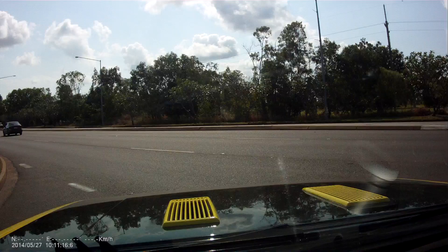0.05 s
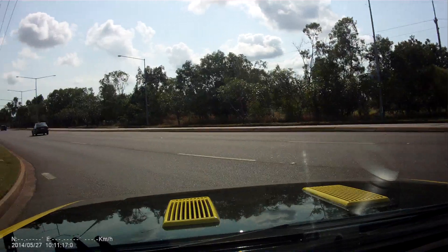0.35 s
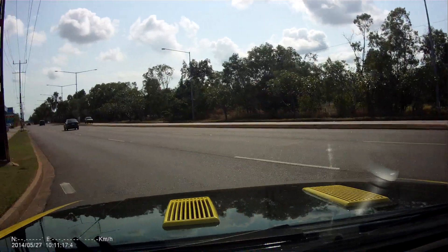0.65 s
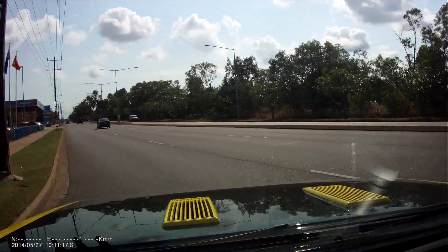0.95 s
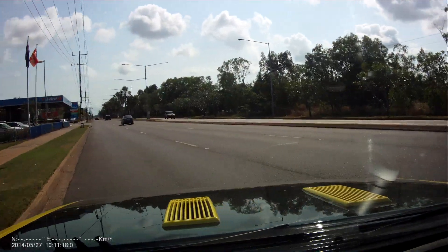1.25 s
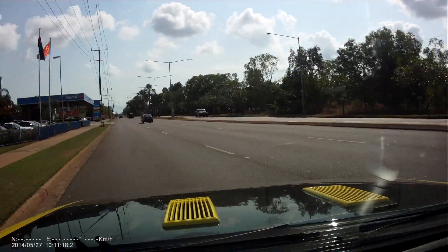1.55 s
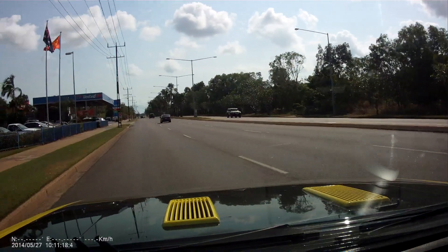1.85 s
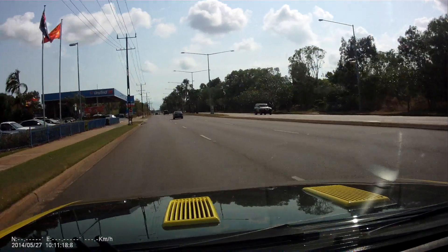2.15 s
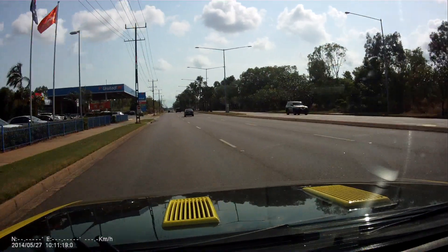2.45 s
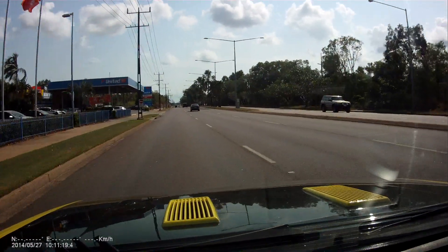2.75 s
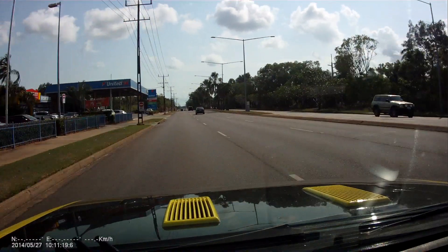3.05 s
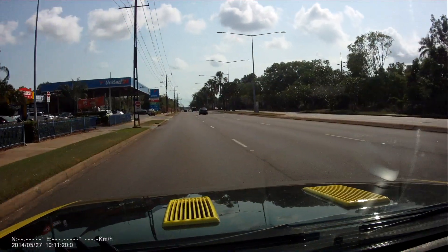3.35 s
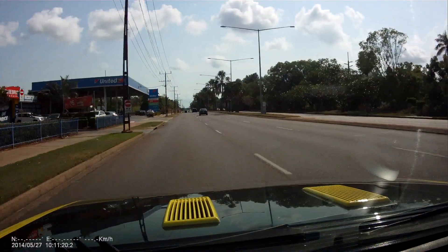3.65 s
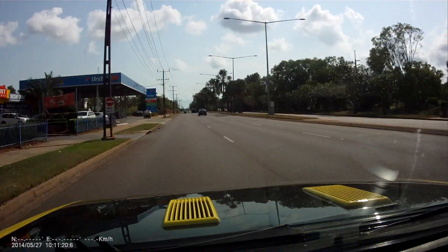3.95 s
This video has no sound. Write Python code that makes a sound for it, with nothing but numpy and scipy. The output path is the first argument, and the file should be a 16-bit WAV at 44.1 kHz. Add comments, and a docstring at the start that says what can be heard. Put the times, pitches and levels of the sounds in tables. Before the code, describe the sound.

A turbocharged car engine accelerates, heard inside the cabin over steady road rumble. Its drone rises for about 2.3 seconds, joined from 1.5 by a growing roar and thin climbing whistle. At 2.4 the gear changes: a deep boom slightly overloads the microphone, a valve hisses for half a second and the pitch falls. From 2.9 the engine climbs again with a faint whine. Plastic trim clicks near 0.4.

```python
"""An exhaust drone climbs over road rumble, inside a turbocharged six-cylinder car pulling hard.
The firings set the pitch, unequal cylinders add growl, and the turbo whistles up over roar and intake rush.
At the one gear change the blow-off valve dumps its boost with a hiss and the body shudders; then the engine
pulls again with a gear whine. Loose trim clicks, and the loudest booms overload the dashboard microphone.
"""
import sys
import numpy as np
from scipy import signal
from scipy.fft import rfft, irfft
from scipy.io import wavfile
from scipy.ndimage import uniform_filter1d

SR = 44100
rng = np.random.default_rng(int(sys.argv[2]) if len(sys.argv) > 2 else 0)


def materialize(psi):
    """Save the field psi as 16-bit PCM at rate SR to the path in sys.argv[1].

    A 1-D psi becomes a single channel; in a 2-D psi each row is a channel.
    """
    bounded = np.clip(np.atleast_2d(psi).T, -1, 1)
    quanta = np.round(bounded * 32767).astype(np.int16)
    wavfile.write(sys.argv[1], SR, quanta)


N = 176400
T = np.arange(N) / SR
FREQS = np.fft.rfftfreq(N, 1 / SR)
BAND_LIMIT_HZ = 15300

# tone colour of the cabin boom: f/Hz, level/dB
BOOM_SPECTRUM = [(10, -9), (29, 3), (42, -7.5), (58, -3.5), (73, -4.5), (95, -12.5), (150, -13),
                 (260, -17.5), (400, -63), (900, -61)]
# swell of the cabin boom: t/s, level/dB
BOOM_ENVELOPE = [(0, -29.5), (.15, -27), (.6, -28), (.78, -28), (.9, -20.5), (1.36, -26), (1.5, -16.5),
                 (1.7, -20.5), (1.9, -16), (2.28, -4.5), (2.38, -6), (2.6, -9), (2.75, -8), (2.9, -16.5),
                 (3.15, -21.5), (3.6, -17.5), (3.88, -16.5), (4, -13)]


def amp(db):
    """Decibels to gain."""
    return 10 ** (np.asarray(db) / 20)


def unit(x):
    """Scales to rms 1."""
    return x / np.sqrt(np.mean(x ** 2) + 1e-20)


def curve(table, column=1):
    """One column of a time table, at every sample."""
    table = np.array(table)
    return np.interp(T, table[:, 0], table[:, column])


def at_hz(table, hz):
    """Reads a spectrum on a log-frequency axis."""
    f, value = np.transpose(table)
    return np.interp(np.log(hz + 1), np.log(f), value)


def phase(hz):
    """Running angle of a steady or gliding pitch."""
    return 2 * np.pi * np.cumsum(hz * np.ones(N)) / SR


def swell(start, length):
    """A half-sine fade in and out."""
    return np.sin(np.pi * np.clip((T - start) / length, 0, 1))


def drift(rate_hz, bins=8000):
    """Slow random wander of rms 1."""
    real, imag = rng.standard_normal((2, bins))
    return unit(irfft((real + 1j * imag) / (1 + (FREQS[:bins] / rate_hz) ** 4), N))


def noise(spectrum):
    """Coloured noise of rms 1, partly alike in both channels."""
    # likeness of left and right: f/Hz, correlation
    likeness = [(120, 1), (220, .8), (500, .86), (4000, .8), (12000, .84)]
    left, other = rfft(rng.standard_normal((2, N)))
    same = at_hz(likeness, FREQS)
    right = same * left + np.sqrt(1 - same ** 2) * other
    return unit(irfft(np.array([left, right]) * amp(at_hz(spectrum, FREQS)), N))


def fuzzy_tone(hz, width_hz):
    """A band of noise that follows a pitch."""
    angle = phase(hz)
    return drift(width_hz / 2) * np.cos(angle) + drift(width_hz / 2) * np.sin(angle)


def exhaust_drone(firing_angle):
    """The exhaust pulses hum at the firing rate and its octave."""
    # drone: t/s, firing tone level/dB, octave level/dB
    levels = [(0, -18, -62), (.07, -19, -47), (.16, -28.5, -42), (.34, -28.5, -29), (.45, -21.5, -25.5),
              (.62, -18, -26.5), (.82, -9.5, -28), (1.2, -10.5, -26), (1.4, -7, -20.5), (1.53, -9.5, -12),
              (1.63, -12, -16.5), (1.75, -20.5, -27.5), (1.86, -11.5, -22), (2.1, -9, -23.5),
              (2.31, -12, -40), (2.39, -33, -30), (2.6, -35, -62), (2.75, -16, -65), (2.84, -14, -30.5),
              (2.92, -7.5, -15.5), (3.06, -10, -23), (3.5, -6.5, -19.5), (3.62, -9, -16),
              (3.78, -10.5, -15), (4, -20.5, -26.5)]
    partials = (amp(curve(levels, k) + .5 * drift(rate_hz=22)) * np.cos(k * firing_angle) for k in (1, 2))
    return np.sqrt(2) * sum(partials)


def exhaust_lines(firing_hz, firing_angle, cylinders=6, uneven_db=-50.5, waver_db=3):
    """Unequal cylinders add lines at sixths of the firing rate; the lowest four shake the cabin."""
    # engine load: t/s, level/dB
    load_envelope = [(0, -1), (1.5, 3), (1.95, 3.5), (2.37, -1.5), (2.41, -7), (2.82, -11.5), (2.91, 2.5),
                     (4, 0.5)]
    # prominent lines: multiple of the firing rate, level/dB
    orders = [(1.5, -35), (3, -34.5), (3.5, -47.5), (4, -40.5), (4.33, -41), (5, -43.5), (5.33, -44),
              (6.33, -43.5)]
    # standing waves of the cabin: f/Hz, level/dB
    standing_waves = [(200, -3.5), (305, 4), (345, -8.5), (400, 1.5), (520, -5), (580, 1), (700, -5.5),
                      (1300, -17)]
    # lowest four lines against the boom: level/dB
    shake_db = [-5.5, -1.5, -3, -3.5]
    load = amp(curve(load_envelope))
    prominent = {round(order * cylinders): db for order, db in orders}
    clean_hz, rough_hz = 151, 360
    rough = np.clip((firing_hz - clean_hz) / (rough_hz - clean_hz), 0, 1)
    out = np.zeros(N)
    for k in range(1, 40):
        order = k / cylinders
        if order in (1, 2):  # the drone plays these
            continue
        hz = firing_hz * order
        if k <= len(shake_db):
            db = shake_db[k - 1] + curve(BOOM_ENVELOPE) + at_hz(BOOM_SPECTRUM, hz)
        else:
            db = prominent.get(k, uneven_db - 9 * np.log2(order / 3)) + at_hz(standing_waves, hz)
        line = np.cos(order * firing_angle + 2 * np.pi * rng.random())
        if 2 < order < 5:  # these turn rough as the engine speeds up
            line = np.sqrt(1 - rough) * line + np.sqrt(rough / 2) * fuzzy_tone(hz, width_hz=32)
        out += load * amp(db + waver_db * drift(rate_hz=5)) * line
    return np.sqrt(2) * out


def road_rumble(level_db=-24):
    """Tyres roll on the road with a steady rumble."""
    # tyre noise: f/Hz, level/dB
    spectrum = [(15, -7.5), (30, 11), (45, -5.5), (110, -4.5), (220, -16.5), (330, -22), (490, -40),
                (590, -19), (760, -27), (1200, -38), (1700, -41), (2250, -49.5), (3000, -42), (4300, -52),
                (5700, -43.5), (6800, -57.5), (13300, -55), (15000, -71)]
    return noise(spectrum) * amp(level_db)


def cabin_boom(offset_db=-5.5):
    """The cabin booms with deep noise, loudest around the gear change."""
    boom = noise(BOOM_SPECTRUM)
    power = uniform_filter1d(boom[0] ** 2, size=4000)
    steadied = unit(boom / np.sqrt(power + 1e-6))
    return steadied * amp(curve(BOOM_ENVELOPE) + offset_db)


def combustion_roar(firing_angle, throb_depth=.13):
    """Combustion noise throbs with the firings."""
    # colour of the roar: f/Hz, level/dB
    spectrum = [(100, -24), (200, 2.5), (350, 1.5), (480, 0.5), (720, -10.5), (1200, -14.5), (1650, -17),
                (2200, -24), (3200, -28), (5000, -34), (15000, -52)]
    # swell of the roar: t/s, level/dB
    envelope = [(0, -47.5), (.6, -38.5), (1.3, -31.5), (1.55, -25), (1.72, -28), (1.83, -25), (2.24, -18.5),
                (2.34, -13.5), (2.41, -24.5), (2.6, -28), (2.93, -30.5), (3.7, -24), (4, -22)]
    throb = 1 + throb_depth * np.cos(firing_angle)
    return noise(spectrum) * amp(curve(envelope) + .64 * drift(rate_hz=91)) * throb


def intake_rush():
    """Air streams into the intake with a bright, grainy rush."""
    # colour of the rush: f/Hz, level/dB
    spectrum = [(800, -27), (2500, -3), (4500, -0.5), (8000, 1.5), (10500, 3), (13000, -1.5), (15500, -9.5)]
    # swell of the rush: t/s, level/dB
    envelope = [(0, -62), (1.55, -49), (1.8, -42), (2.2, -39), (2.34, -32), (2.4, -36.5), (2.5, -54),
                (2.9, -54.5), (3.3, -47.5), (3.65, -43), (4, -40.5)]
    return noise(spectrum) * amp(curve(envelope) + .76 * drift(rate_hz=110))


def turbo(flicker_db=4):
    """The turbo spins a thin, trembling whistle, with rushing air just below and a fainter band above."""
    # whistle: t/s, f/Hz, level/dB
    spool = [(0, 2800, -78), (1, 4550, -74), (1.45, 5450, -62), (1.58, 5650, -59.5), (1.8, 7680, -50),
             (1.93, 8780, -46.5), (2.07, 9720, -52), (2.22, 10200, -52), (2.32, 10800, -45.5),
             (2.45, 11000, -72), (2.9, 4500, -72), (3.02, 4780, -61), (3.26, 5750, -61.5),
             (3.45, 6600, -57), (3.8, 8700, -49.5), (4, 9400, -46.5)]
    hz = curve(spool) * (1 + .003 * drift(rate_hz=120))
    whistle = np.sqrt(2) * np.cos(phase(hz)) * amp(.3 + flicker_db * drift(rate_hz=28))
    air_below = amp(.7) * fuzzy_tone(.94 * hz, width_hz=1400)
    air_above = amp(-2) * fuzzy_tone(1.43 * hz, width_hz=1100)
    return amp(curve(spool, column=2)) * (whistle + air_below + air_above)


def trim_clicks(attack_s=.0012, ring_db=-4.5):
    """Loose plastic rattles in short, scratchy clicks; those that ring lower are also duller."""
    # clicks: t/s, level/dB, 60 dB decay/s, ring f/Hz
    clicks = [(0.26, -28.5, 0.046, 10540), (.331, -44.5, 0.041, 6500), (0.353, -41.5, 0.035, 7240),
              (.367, -44, 0.038, 6460), (0.4, -15.5, 0.018, 10760), (.402, -24, 0.068, 7900),
              (0.405, -25, 0.065, 268), (.425, -28, 0.024, 8600), (0.437, -38, 0.035, 1520),
              (2.648, -32, 0.079, 13700), (2.671, -33, .08, 13500), (2.803, -32.5, .06, 12700),
              (3.453, -27, 0.05, 11800)]
    # colour of the plastic: f/Hz, level/dB
    spectrum = [(1500, -7.5), (3000, -4.5), (5500, -2), (7800, 2), (9000, -2.5), (10200, 9), (12000, -15),
                (15500, 5.5)]
    plastic = noise(spectrum)
    out = np.zeros((2, N))
    for start, db, t60, hz in clicks:
        age = np.maximum(T - start, 0)
        envelope = np.minimum(age / attack_s, 1) * amp(db - 60 * np.minimum(age / t60, 2))
        lowpass = signal.butter(1, min(1.25 * hz, BAND_LIMIT_HZ), fs=SR)
        scratch = unit(signal.lfilter(*lowpass, plastic))
        out += envelope * (scratch + amp(ring_db) * fuzzy_tone(hz, width_hz=290))
    return out


def body_shudders(hz=29.3):
    """The car body shudders as the load changes."""
    # shudders: t/s, length/s, level/dB
    shudders = [(0.655, 0.22, -16), (1.421, .2, -13.5), (2.388, 0.25, -8.5)]
    out = np.zeros(N)
    for start, length, db in shudders:
        out += amp(db) * swell(start, length) * np.sin(2 * np.pi * hz * (T - start))
    return np.sqrt(2) * out


def growls(firing_hz, rasp_db=-8):
    """One uneven exhaust line at a time swells under boost or barks as the throttle shuts."""
    # growls: t/s, length/s, multiple of the firing rate, level/dB
    events = [(1.817, 0.36, 2.333, -25.5), (2.327, 0.037, 1.833, -18.5), (2.361, 0.046, 1.5, -12),
              (2.442, .08, 1.333, -22)]
    out = np.zeros((2, N))
    for start, length, order, db in events:
        hz = order * firing_hz
        tone = np.sqrt(2) * np.cos(phase(hz))
        rasp = np.array([fuzzy_tone(hz, width_hz=70) for side in range(2)])
        out += amp(db) * swell(start, length) * (tone + amp(rasp_db) * rasp)
    return out


def blow_off(open_s=2.4, shut_s=2.86, level_db=-27, fade_db_per_s=32.5):
    """The valve snaps open, hisses as the pressure drains, and shuts when the throttle returns."""
    # colour of the hiss: f/Hz, level/dB
    spectrum = [(900, -29), (1600, 0.5), (2800, -2), (4500, 0.5), (7500, 1.5), (13500, -5.5), (15500, -1)]
    attack_s, hold_s, release_s = .0094, .093, .11
    age = T - open_s
    gate = np.clip(age / attack_s, 0, 1) * np.clip((shut_s - T) / release_s, 0, 1)
    return noise(spectrum) * gate * amp(level_db - fade_db_per_s * np.maximum(age - hold_s, 0))


def gear_whine(firing_angle, engage_s=2.85, order=4.81, level_db=-36.5, waver_db=3):
    """After the shift, the new gear whines in step with the engine."""
    engaged = np.clip((T - engage_s) / .022, 0, 1)
    gain = engaged * amp(level_db + waver_db * drift(rate_hz=15.7))
    return np.sqrt(2) * gain * np.cos(order * firing_angle)


def cabin_reflections(x, t60_s=.07, wet_db=-10, taps=4096):
    """Dense, quickly dying reflections from glass and trim colour the sound."""
    shared, per_side = rng.standard_normal(taps), rng.standard_normal((2, taps))
    tail = (shared + .5 * per_side) * amp(-60 * T[:taps] / t60_s)
    tail *= amp(wet_db) / np.linalg.norm(tail[0])
    wet = signal.fftconvolve(x, tail, axes=1)[:, :N]
    return (x + wet) / np.hypot(1, amp(wet_db))


def scene():
    """The engine revs up, drops at the shift and climbs again; the mix leans to the left."""
    # engine firing rate: t/s, f/Hz
    revs = [(0, 89.6), (.25, 93.74), (.5, 106.7), (.68, 112.6), (1, 127.3), (1.39, 141.5), (1.5, 153.6),
            (1.63, 162.2), (2, 195.9), (2.23, 220.3), (2.36, 221.2), (2.65, 163.8), (2.86, 135.4),
            (3.08, 138.3), (3.2, 137.6), (3.37, 146.9), (3.5, 148.5), (3.8, 161.1), (4, 173.1)]
    # left over right: f/Hz, level/dB
    balance = [(30, 6.4), (250, 5.7), (1100, 6.5), (2200, 5.4), (8000, 4.5), (13000, 3.2)]
    firing_hz = curve(revs) * (1 + .00309 * drift(rate_hz=20))
    firing_angle = phase(firing_hz)
    tones = exhaust_drone(firing_angle) + exhaust_lines(firing_hz, firing_angle) + gear_whine(firing_angle)
    air = combustion_roar(firing_angle) + intake_rush() + blow_off()
    mix = tones + cabin_reflections(air) + growls(firing_hz) + turbo()
    mix += cabin_boom() + road_rumble() + body_shudders() + trim_clicks()
    lean = amp(at_hz(balance, FREQS))
    pan = np.array([2 * lean, np.full_like(lean, 2)]) / (1 + lean)
    return irfft(rfft(mix) * pan, N)


def record(dry, knee=7):
    """The overloaded microphone rounds off the peaks; a steep low-pass trims the top treble."""
    clipped = dry / (1 + abs(dry) ** knee) ** (1 / knee)
    lowpass = signal.firwin(511, BAND_LIMIT_HZ, window=("kaiser", 9), fs=SR)
    return signal.oaconvolve(clipped, lowpass[None], "same", axes=1)


dry = scene()
out = record(dry)
materialize(out)
```